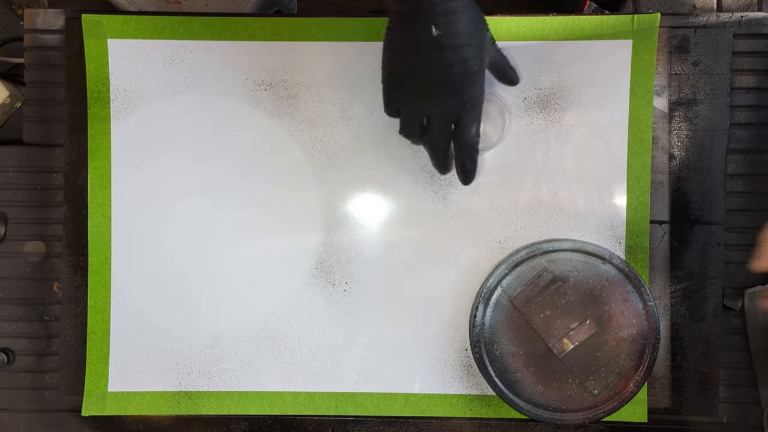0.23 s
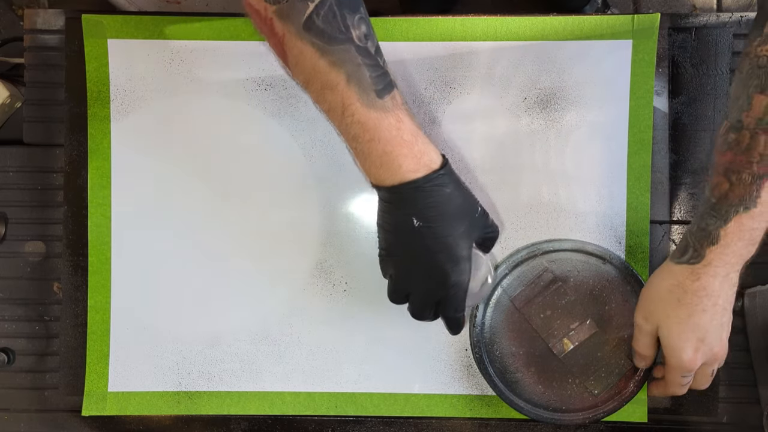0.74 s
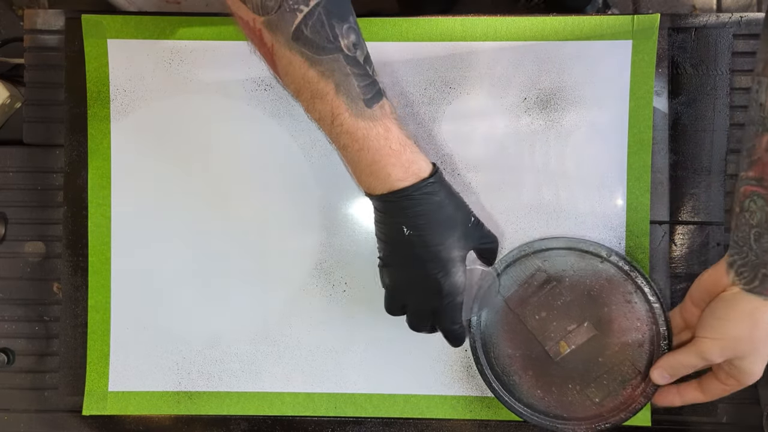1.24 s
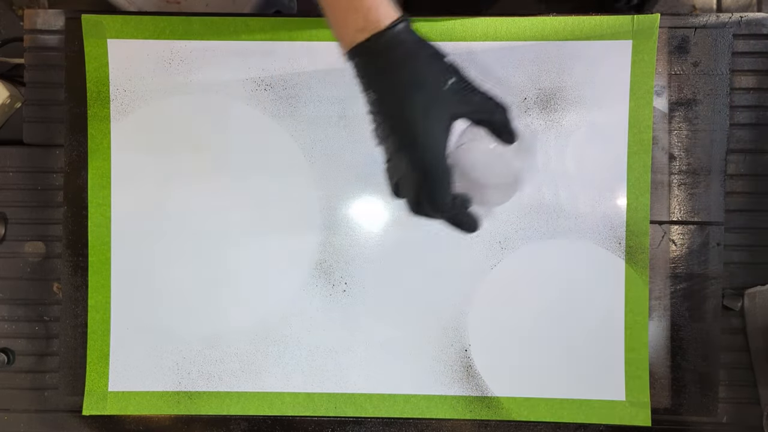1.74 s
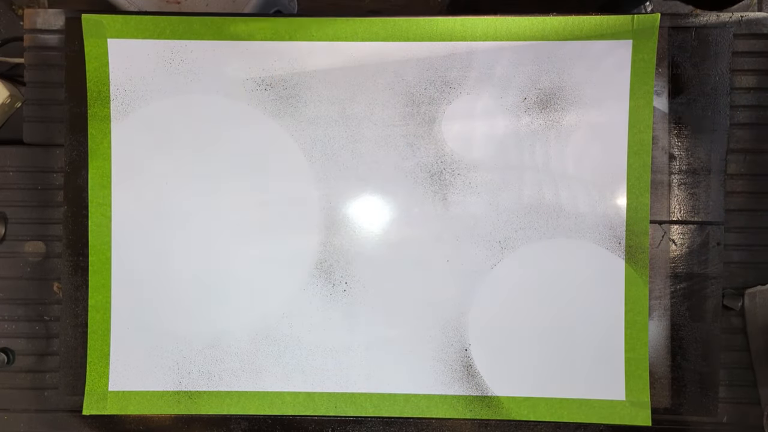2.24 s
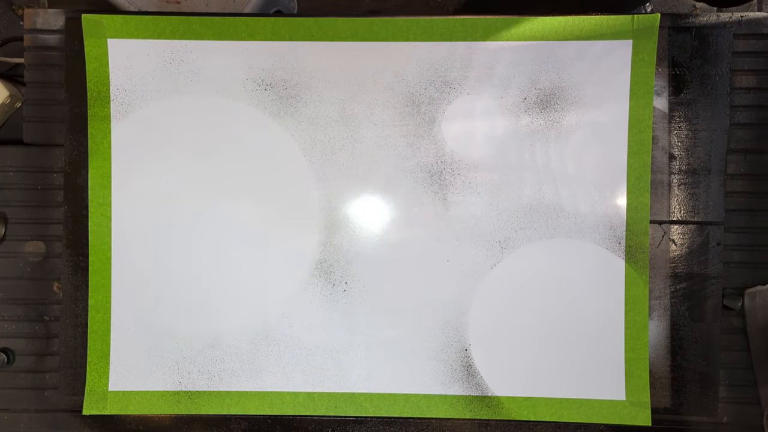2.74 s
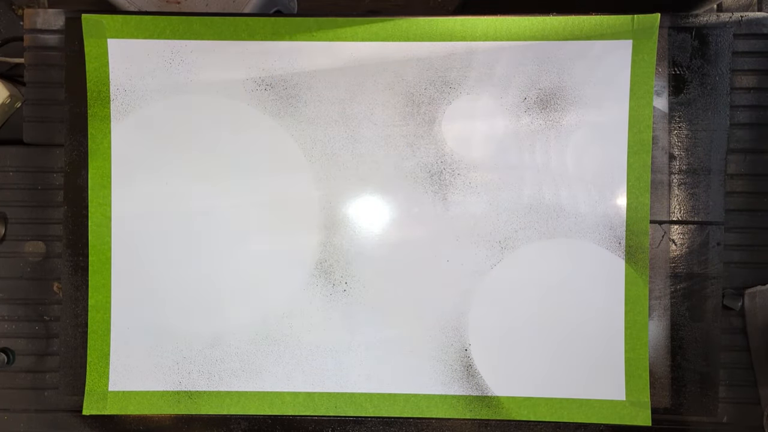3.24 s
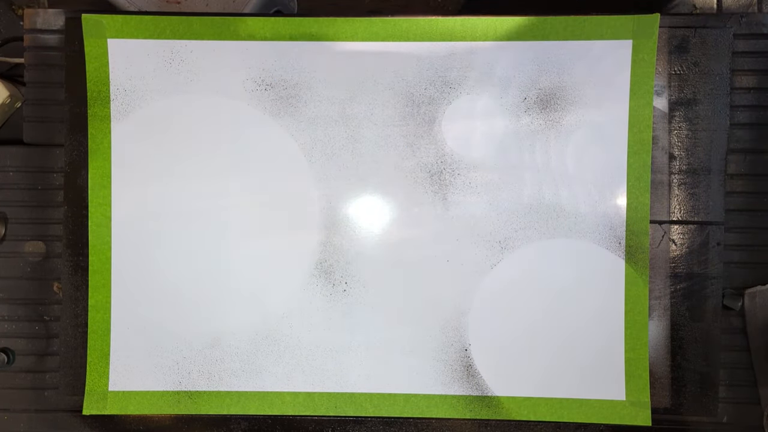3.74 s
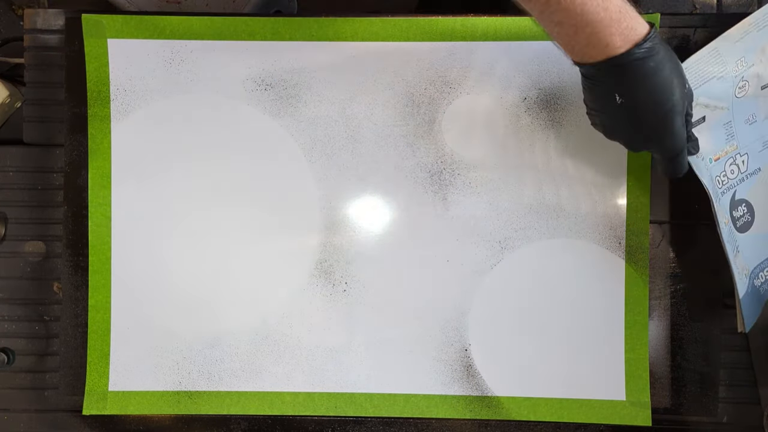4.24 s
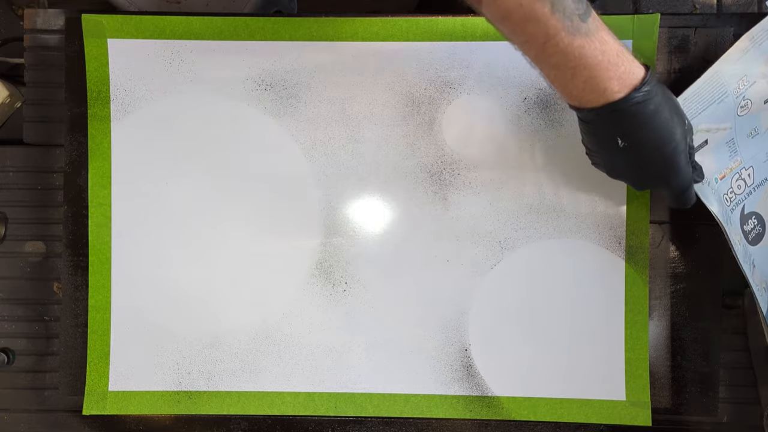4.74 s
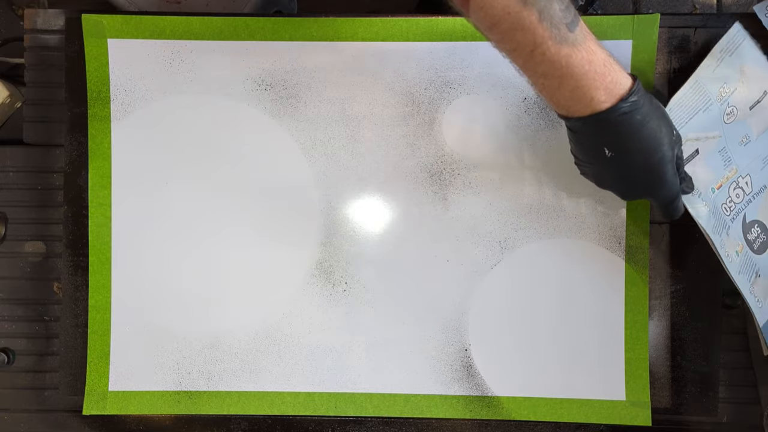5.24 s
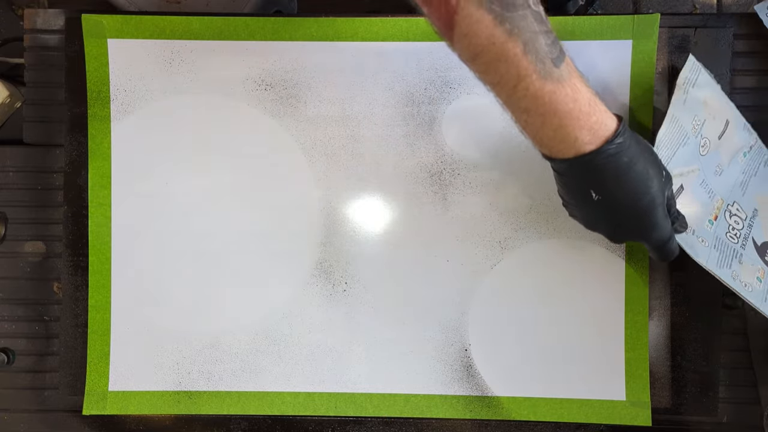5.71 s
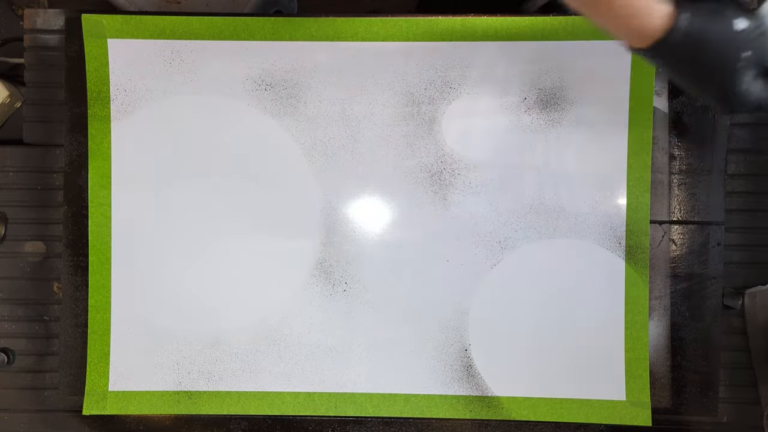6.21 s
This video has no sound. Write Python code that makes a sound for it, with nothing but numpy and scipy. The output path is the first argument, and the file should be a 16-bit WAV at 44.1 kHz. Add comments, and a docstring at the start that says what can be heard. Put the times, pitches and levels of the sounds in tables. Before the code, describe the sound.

A low, soft extractor-fan drone with faint airy hiss runs throughout a small, dry workshop, heard close in stereo. Around 0.8 s there is a muted table bump, then at 1.0-1.3 s light grainy glove swishes with another soft thud. At 1.6 s a plastic lid scuffs as it is lifted, with fainter brushes near 1.8 s. A smooth short slide passes at 2.1-2.4 s. At 2.67 and 2.8 s two loud, hard clacks ring briefly, tinny then plastic. A quick double knock on the table at 3.3 s is followed by lid clatters at 3.4-3.5 s and lighter ones by 3.76 s. From 3.9 s a page rustles; at 4.13-4.5 s it crackles strongly with a flap and sharp ticks. Irregular crinkles and hissing drags continue, with a strong flap and snap at 5.23 s, more ticks near 5.7 s, another flap at 6.0 s, then small rustles to the end.

```python
"""A small, dry workshop: a work table with an extractor fan droning behind it, made of coloured noise.
Gloved hands lift two lids off a painted sheet, brushing in fine-grained noise.
Lids and tins are put down hard at the side: short pulses in a scattering room, with ringing modes.
Then a printed page is picked up, flexed and dragged over the table edge: noise and random buckles
rustle, hiss and flap under stroke gains, and creases snap with dry ticks."""
import sys
import numpy as np
from scipy import signal
from scipy.fft import rfft, irfft, next_fast_len
from scipy.io import wavfile

SR = 44100
rng = np.random.default_rng(int(sys.argv[2]) if len(sys.argv) > 2 else 0)


def unload_wav(signal):
    """Save mono or channel-first audio to the path in sys.argv[1] as 16-bit WAV at rate SR, clipped to [-1, 1]."""
    wavfile.write(
        sys.argv[1],
        SR,
        np.round(np.clip(np.atleast_2d(signal).T, -1, 1) * 32767).astype(np.int16),
    )


N = 285327
TIME = np.arange(N) / SR
SHORT = TIME[:16384]  # time axis of one struck sound [s]


def from_db(db):
    """Decibels to gain."""
    return 10 ** (np.asarray(db) / 20)


def rms_one(x):
    """Scale to rms 1 over all channels."""
    return x / np.sqrt(np.mean(x ** 2) + 1e-20)


def energy_one(x):
    """Scale each channel to unit energy."""
    return x / np.sqrt(np.sum(x ** 2, axis=-1, keepdims=True) + 1e-20)


def at_hz(points, hz):
    """Read a table on a log-frequency axis."""
    f, value = np.transpose(points)
    return np.interp(np.log(hz + 1), np.log(f), value)


def treble(hz):
    """How far a frequency belongs to the treble, 0-1."""
    above_hz = 3800
    return hz ** 2 / (hz ** 2 + above_hz ** 2)


def add(out, sound, s):
    """Mix a short sound in at time s."""
    start = int(s * SR)
    out[:, start:start + sound.shape[1]] += sound[:, :N - start]


def colour(x, spectrum):
    """Filter a long sound by a spectrum table; rms 1."""
    size = next_fast_len(N)
    gain = from_db(at_hz(spectrum, np.fft.rfftfreq(size, 1 / SR)))
    return rms_one(irfft(rfft(x, size) * gain, size)[..., :N])


def click(level_db):
    """Minimum-phase pulse: the most compact causal pulse with the given spectrum."""
    cepstrum = irfft(np.log(from_db(level_db)))
    half = len(cepstrum) // 2
    cepstrum[1:half] *= 2
    cepstrum[half + 1:] = 0
    return irfft(np.exp(rfft(cepstrum)))


def room(x, lag_s, wet_db, scatter_s, scatter_db):
    """Direct sound and a swell of close scatter reach the left first; a short diffuse tail follows."""
    t60_s, tail_rise_s = 0.21, 0.0012
    balance = from_db([[.5], [-.5]])
    swell = (SHORT / scatter_s) ** 2 * np.exp(-SHORT / scatter_s)
    near = from_db(scatter_db) * energy_one(rng.standard_normal(len(SHORT)) * swell)
    near[0] += 1  # direct sound
    near = energy_one(np.array([near, np.roll(near, int(lag_s * SR))]))
    tail = rng.standard_normal((2, len(SHORT))) * np.exp(-np.log(1000) * SHORT / t60_s)
    tail *= 1 - np.exp(-SHORT / tail_rise_s)
    response = energy_one(near + from_db(wet_db) * energy_one(tail)) * balance
    return signal.fftconvolve(x[None], response, axes=1)[:, :len(x)]


def swells(events, rise_db_per_s, fall_db_per_s):
    """Gain of brief movements that each rise to a peak and fall away; their powers add."""
    power = 0
    for s, peak_db in events:
        drop_db = np.maximum(rise_db_per_s * (s - TIME), fall_db_per_s * (TIME - s))
        power = power + from_db(peak_db - np.minimum(drop_db, 200)) ** 2
    return np.sqrt(power)


def grains(per_s, spread_db):
    """Tiny buckles at random moments, mostly small, a few large; rms 1."""
    sizes = from_db(spread_db * np.minimum(rng.exponential(1, N), 4.5)) * rng.choice([-1, 1], N)
    return rms_one(sizes * (rng.random(N) < per_s / SR))


def drift(per_s):
    """A slow random wander; rms 1."""
    steps = rng.standard_normal(int(per_s * N / SR) + 2)
    return rms_one(np.interp(TIME * per_s, np.arange(len(steps)), steps))


def fan():
    """A low drone, most alike on both sides in the bass, with duct resonances, under diffuse air noise."""
    # drone spectrum: (frequency [Hz], relative level [dB])
    drone_spectrum = [(20, -35), (35, -10), (48, 1.5), (62, 10.5), (76, -1), (93, 2), (120, -2),
                      (160, -13.5), (240, -22.5), (370, -18.5), (600, -16.5), (800, -19.5), (2300, -24.5),
                      (3100, -36), (14000, -75.5)]
    # air noise spectrum: (frequency [Hz], relative level [dB])
    air_spectrum = [(1500, -20), (3000, 0), (5000, -4), (8000, -8), (12000, -11), (13500, -36)]
    # left-right correlation of the drone: (frequency [Hz], correlation [-1..1])
    likeness = [(60, 0.99), (130, 0.94), (290, 0.9), (640, .33), (1400, -0.24), (3100, 0.12)]
    # duct resonances: (frequency [Hz], width at half amplitude [Hz], rms level [dB])
    duct_modes = [(291, 6.9, -80), (375.5, 35, -79.5), (539.6, 14, -76), (705, 12.4, -84)]
    # air noise sinks a little early on: (time [s], rms level [dB])
    air_level = [(.7, -77.5), (.85, -80.5)]
    drone_db = -53

    size = next_fast_len(N)
    hz = np.fft.rfftfreq(size, 1 / SR)
    alike = np.clip(at_hz(likeness, hz), -1, 1)
    mid, side = rfft(rng.standard_normal((2, size)))
    source = np.sqrt(1 + alike) * mid + np.sqrt(1 - alike) * side * [[1], [-1]]
    drone = from_db(drone_db) * colour(irfft(source, size), drone_spectrum)
    duct = 0
    for mode_hz, width_hz, db in duct_modes:
        resonance = irfft(source / (1 + (2 * (hz - mode_hz) / width_hz) ** 2), size)[:, :N]
        duct = duct + from_db(db) * rms_one(resonance)
    air_gain = from_db(np.interp(TIME, *np.transpose(air_level)))
    air = air_gain * colour(rng.standard_normal((2, N)), air_spectrum)
    return drone + duct + air


def gloves():
    """Thin rubber brushes over plastic in short, fine-grained swishes."""
    # gloves brushing the lids: (peak time [s], peak level [dB])
    swishes = [(1.02, -57), (1.21, -60.5), (1.26, -69.5), (1.32, -68), (1.575, -54.5), (1.78, -62.5),
               (1.85, -62)]
    # (frequency [Hz], relative level [dB])
    spectrum = [(200, 1), (600, 10.0), (2000, 4), (5000, -3), (12000, -5.0), (15000, -15)]
    swish = colour(grains(per_s=7100, spread_db=5.5), spectrum)
    swish = rms_one(room(swish, lag_s=.0002, wet_db=4.5, scatter_s=0.00072, scatter_db=18))
    return swish * swells(swishes, rise_db_per_s=650, fall_db_per_s=423)


def ring(modes):
    """Each mode is a close pair that beats; it builds up fast, with its own phase offset between sides."""
    rise_s, balance = 0.0012, from_db([[.5], [-.5]])
    out = 0
    for hz, db, t60_s in modes:
        decay = np.exp(-np.log(1000) * SHORT / t60_s)
        partner_hz = rng.choice([-1, 1]) * rng.uniform(20, 50)
        for detune_hz, share_db in [(0, 0), (partner_hz, -7)]:
            right_phase = rng.choice([-1, 1]) * rng.uniform(1, 1.72)  # rad
            phase = 2 * np.pi * rng.random() + np.array([[0], [right_phase]])
            tone = np.sin(2 * np.pi * (hz + detune_hz) * SHORT + phase)
            out = out + from_db(db + share_db) * tone * decay
    return out * (1 - np.exp(-(SHORT / rise_s) ** 2)) * balance


def knocks():
    """A scuffing blow with one hollow resonance, led by a faint copy of itself, and the thing rings."""
    # modes by struck thing: (frequency [Hz], relative level [dB], t60 [s])
    rings = { "tin": [(554, -15, .19), (845, -15, .19), (1705, 0, .12), (2498, -3, .19), (2745, -14, .16),
             (3246, -4, .12), (3666, -8, .2), (5001, -11, .12), (5276, -15, .1), (5696, -23, .13),
             (6196, -16, .12), (6971, -24, .13)], "lid": [(1290, -31, 0.17), (1624, -5.5, 0.23),
             (2134, -15, 0.1186), (2420, -2, 0.13), (2460, -15, 0.25), (2600, 5, 0.085),
             (3710, -12.5, 0.14)], "rim": [(780, -11.5, 1), (1220, -3.5, 0.16), (1840, -15, 1),
             (2370, -17.5, 1)], "table": [(393, -9, .15), (501, -2, .17), (560, -6, .2), (613, 1, .16),
             (731, -2, .14), (985, -3, .13), (1034, -1, .13), (1253, -2, .14), (1464, -8, .15)], }
    # (time [s], what rings, blow [dB], bass weight [dB], treble lift [dB], ring [dB],
    #  scuff time constant [s], hollow pitch [Hz], hollow boost [dB])
    knock_events = [ (0.799, "table", -11, 15.5, -48, -55, 0.00054, 644, 6),
                    (1.087, "table", -17.5, 8.5, -21, -65, .004, 440, 16),
                    (1.593, "lid", -14, 0, -9, -78, .004, 1800, 9),
                    (2.667, "tin", 23, -14, -23, -18.5, .00082, 1690, 10),
                    (2.799, "lid", 23, -8.5, -16, -20, 0.00076, 2600, 7),
                    (3.29, "table", 8.5, 7.5, 6, -58, 0.002, 1100, 3),
                    (3.296, "table", 18, -1, -8, -25.5, 0.0021, 606, 8),
                    (3.427, "rim", -22.5, 16, 16, -39.5, .001, 1320, 8.5),
                    (3.499, "lid", 18, -7.5, -9, -60, 0.001, 1430, 5),
                    (3.708, "lid", -9, 5, 3.5, -74, 0.0014, 1440, 5.5),
                    (3.76, "lid", 9.5, -10, -17, -51, 0.0019, 1600, 11.5), ]
    # basic blow spectrum: (frequency [Hz], relative level [dB])
    blow_spectrum = [(60, -15.5), (200, -11), (600, -2), (1800, -1.5), (5000, -9), (11000, -12),
                     (16000, -21.5)]
    weight_below_hz, hollow_half_width = 1160, 0.088  # half width as a share of the pitch
    faint_copy_db, faint_copy_lead_s = -18, .004

    out, hz = np.zeros((2, N)), np.fft.rfftfreq(len(SHORT), 1 / SR)
    for s, thing, db, weight_db, lift_db, ring_db, scuff_s, hollow_hz, hollow_db in knock_events:
        weight = weight_db / (1 + (hz / weight_below_hz) ** 4)
        hollow = hollow_db / (1 + ((hz / hollow_hz - 1) / hollow_half_width) ** 2)
        blow = click(db + at_hz(blow_spectrum, hz) + weight + lift_db * treble(hz) + hollow)
        contact = room(blow, lag_s=.00045, wet_db=2.5, scatter_s=scuff_s, scatter_db=7.5)
        add(out, from_db(faint_copy_db) * contact, s - faint_copy_lead_s)
        add(out, contact + from_db(ring_db) * ring(rings[thing]), s)
    return out


def snaps():
    """A crease flips over with one dry tick."""
    # creases that snap through: (time [s], level [dB], treble lift [dB])
    snap_events = [(4.131, 0.5, -25), (4.158, -15, -6), (4.189, 2.5, -1), (4.21, 1, 2), (4.359, -2, 5),
                   (4.464, -7.5, 7.5), (4.753, -12.5, 9.5), (4.970, -1.5, -2.5), (5.233, 1, -23),
                   (5.247, -3, -9), (5.360, -7.5, -7.5), (5.666, -3.5, 0.5), (5.722, -4, -17),
                   (6.005, 1, -17), (6.15, -8, -21.5), (6.267, -15, -11)]
    # basic tick spectrum: (frequency [Hz], relative level [dB])
    tick_spectrum = [(150, -11), (600, -19), (1500, 0.5), (2800, -5), (5000, -9), (12000, -16),
                     (16000, -24)]
    out, hz = np.zeros((2, N)), np.fft.rfftfreq(len(SHORT), 1 / SR)
    for s, db, lift_db in snap_events:
        tick = click(db + at_hz(tick_spectrum, hz) + lift_db * treble(hz))
        add(out, room(tick, lag_s=.00032, wet_db=-2.5, scatter_s=.0005, scatter_db=2), s)
    return out


def flex(x, depth_db, per_s):
    """As a sheet bends its resonances come and go: each half octave swells on its own."""
    size = next_fast_len(N)
    spectrum, hz = rfft(x, size), np.fft.rfftfreq(size, 1 / SR)
    band = 2 * np.log2(np.clip(hz, 250, 16000) / 250)  # half octaves above 250 Hz
    out = 0
    for k in range(int(band.max()) + 1):
        share = np.maximum(1 - abs(band - k), 0)
        out = out + irfft(spectrum * share, size)[:N] * from_db(depth_db * drift(per_s))
    return out


def stroke_controls(strokes):
    """A stroke gathers speed, pulls tighter and dies away: rustle gain, hiss gain, tautness in dB."""
    attack_share, tighten_db, release_db_per_s = 0.37, 4, 256.5
    rustle_power, hiss_power, taut = np.zeros((3, N))
    for s, length_s, rustle_db, hiss_db, swell_db, taut_db in strokes:
        span = slice(int(s * SR), int((s + length_s + .5) * SR))
        age_s = np.maximum(TIME[span] - s, 0)
        progress = np.minimum(age_s / length_s, 1)
        attack = np.sin(np.pi / 2 * np.minimum(progress / attack_share, 1)) ** 2
        release_db = release_db_per_s * np.maximum(age_s - length_s, 0)
        gain = attack * from_db(swell_db * (progress - .5) - release_db)
        power = (gain * from_db(rustle_db)) ** 2
        rustle_power[span] += power
        hiss_power[span] += (gain * from_db(hiss_db)) ** 2
        taut[span] += power * (taut_db + tighten_db * (progress - .5))
    # overlapping strokes: tautness is averaged by rustle power
    return np.sqrt(rustle_power), np.sqrt(hiss_power), taut / (rustle_power + 1e-20)


def sheet(strokes, flapping, bend_db, crinkle_db):
    """Paper flaps low, rustles in the middle and hisses as it slides; crinkles run through all three."""
    # spectra: (frequency [Hz], relative level [dB])
    flap_spectrum = [(90, -24), (170, -2), (230, -17), (290, -3), (370, -13.5), (480, -4.5), (700, -10.5),
                     (1400, -51)]
    rustle_spectrum = [(350, -16), (650, 1), (850, 6.5), (1400, 3.5), (2500, 1), (3600, -4.5), (4600, -36),
                       (8000, -39)]
    hiss_spectrum = [(2500, -25), (4200, 0), (6500, -.5), (10000, -1.8), (13000, -2.5), (16000, -12)]
    flutter_db = -18.5  # low flutter that goes with any rustle, relative to its gain

    friction = rng.standard_normal(N) + grains(per_s=2500, spread_db=3.5)
    friction = flex(friction, depth_db=bend_db, per_s=22)
    rubbing = rms_one(room(friction, lag_s=0.00036, wet_db=15.0, scatter_s=0.00016, scatter_db=0))
    buckles = flex(grains(per_s=420, spread_db=4), depth_db=5, per_s=90)
    crinkle = rms_one(room(buckles, lag_s=.00032, wet_db=-3, scatter_s=.0002, scatter_db=-3))
    texture = rubbing + from_db(crinkle_db) * crinkle

    flap = colour(texture, flap_spectrum)
    rustle = colour(texture, rustle_spectrum)
    hiss = colour(texture, hiss_spectrum)
    rustle_gain, hiss_gain, taut_db = stroke_controls(strokes)
    # a taut sheet rustles higher than a slack one
    slack = signal.sosfiltfilt(signal.butter(2, 1500, fs=SR, output="sos"), rustle)
    tilt = from_db(taut_db)
    rustle = (slack / tilt + (rustle - slack) * tilt) / np.sqrt((tilt ** 2 + tilt ** -2) / 2)
    flap_gain = np.hypot(flapping, from_db(flutter_db) * rustle_gain)
    return flap_gain * flap + rustle_gain * rustle + hiss_gain * hiss


def paper():
    """A flat sheet slides evenly over the table; the bent page crackles and flaps."""
    # sheet slid flat, then page lifted, bent and dragged: (time [s], length [s], rustle [dB],
    #  sliding hiss [dB], swell over the stroke [dB], tautness [dB])
    slides = [(2.12, 0.12, -64, -72.5, -2, 2), (2.225, 0.2, -49, -49, -4, -0.5)]
    strokes = [ (3.655, 0.068, -56.5, -58, -2, 11), (3.79, 0.049, -62, -61, 1, -14),
               (3.91, 0.034, -70, -64, 0, 9), (3.985, 0.038, -60, -79, -6, -1),
               (4.125, 0.074, -43, -46.5, 14, 0.5), (4.29, 0.046, -53, -59, -4.5, 0),
               (4.41, .15, -46, -47, -5.5, 3), (4.62, 0.047, -58.5, -60.5, -1.5, -3.5),
               (4.725, 0.17, -52.5, -50, 5.5, -1), (4.90, 0.12, -53, -54, -3.5, 0),
               (5.045, 0.055, -51.5, -50.5, -4, 3), (5.19, 0.038, -54.5, -61.5, 16, 13),
               (5.225, 0.028, -40.5, -47.5, 3.5, 1), (5.295, .022, -57, -49.5, -13, -14),
               (5.39, .25, -50.5, -52.5, 9, -0.5), (5.66, 0.11, -51, -44.5, 9, 4),
               (5.90, 0.17, -49, -53, -2.5, 3), (6.135, 0.037, -51.5, -55, 2, 3),
               (6.265, 0.018, -55.5, -74, -8, 20), (6.36, 0.1, -60, -65, 19, 1), ]
    # whole sheet flaps, pressed under a lid or turned in the hand: (peak time [s], peak level [dB])
    flaps = [(1.103, -48.5), (4.2, -44.5), (4.37, -56.5), (5.25, -41), (5.96, -53.5), (6.015, -44.5)]
    flapping = swells(flaps, rise_db_per_s=650, fall_db_per_s=420)
    flat = sheet(slides, 0, bend_db=1.2, crinkle_db=-10)
    bent = sheet(strokes, flapping, bend_db=2.5, crinkle_db=-.5)
    return flat + bent


def scene():
    """Everything at the table, over the fan."""
    return fan() + gloves() + knocks() + snaps() + paper()


def record(dry):
    """A steep elliptic low-pass cuts the top."""
    cutoff_hz = 15900
    return signal.sosfilt(signal.ellip(10, .1, 80, cutoff_hz, fs=SR, output="sos"), dry)


dry = scene()
out = record(dry)
unload_wav(out)
```